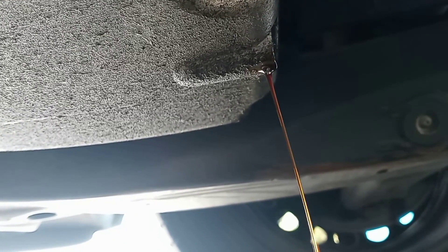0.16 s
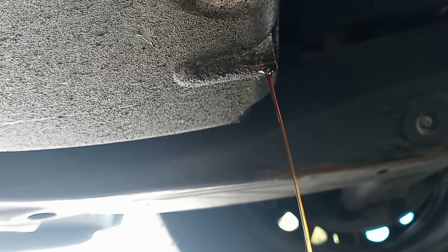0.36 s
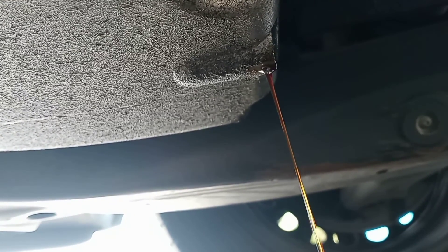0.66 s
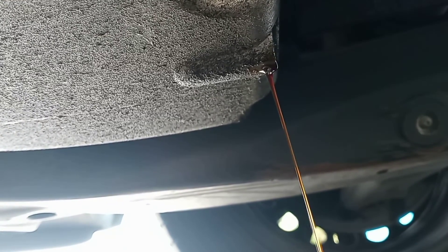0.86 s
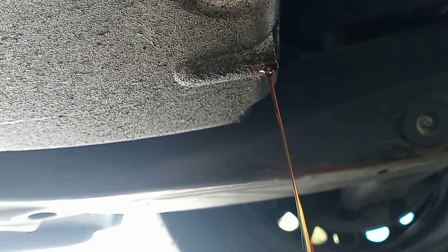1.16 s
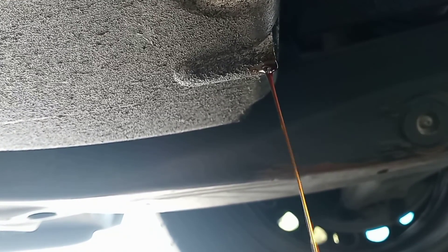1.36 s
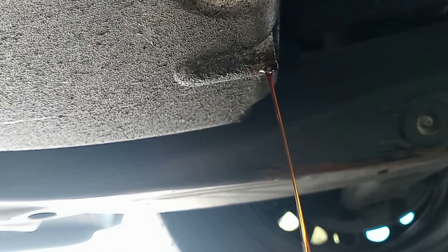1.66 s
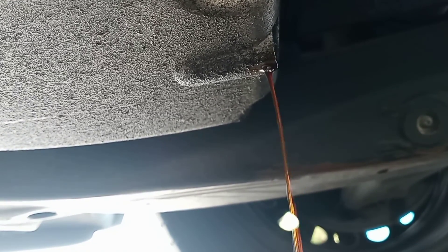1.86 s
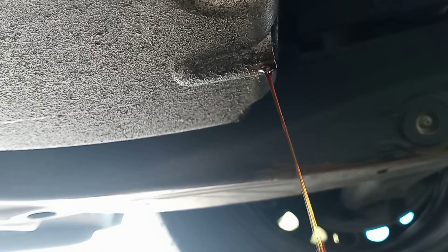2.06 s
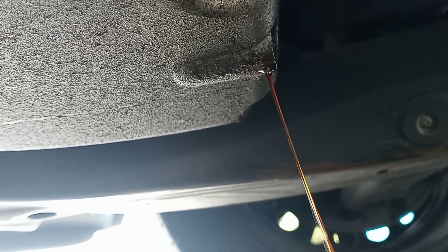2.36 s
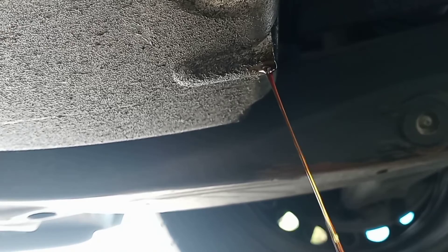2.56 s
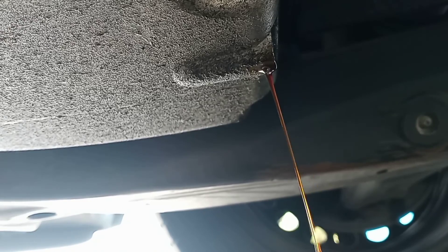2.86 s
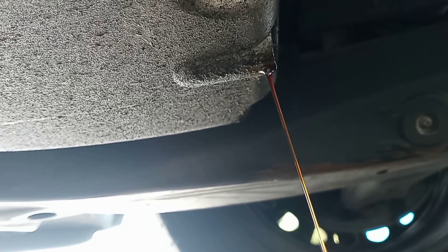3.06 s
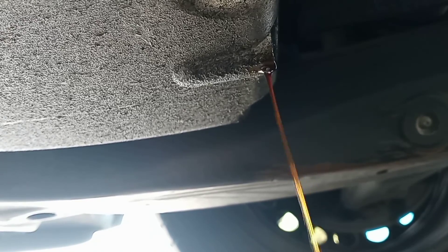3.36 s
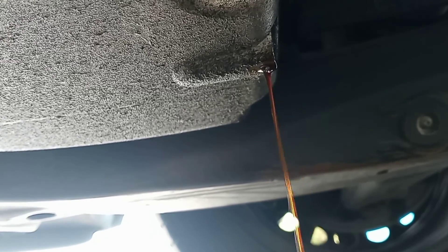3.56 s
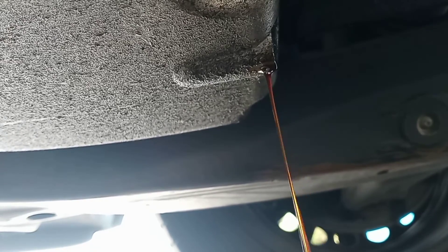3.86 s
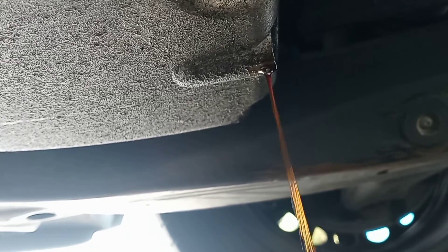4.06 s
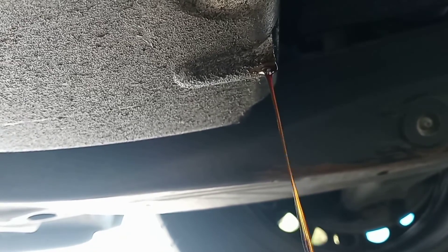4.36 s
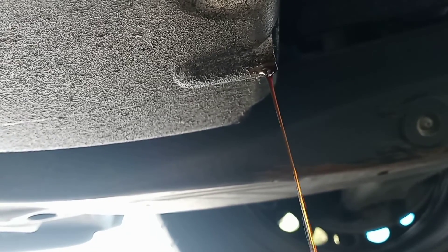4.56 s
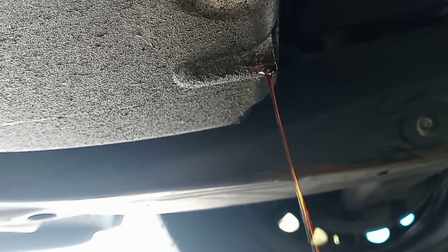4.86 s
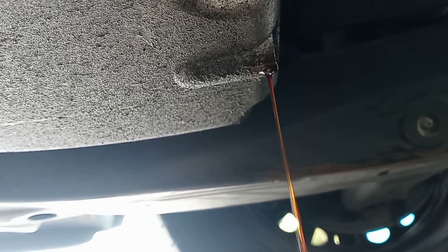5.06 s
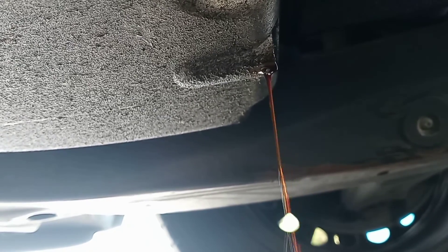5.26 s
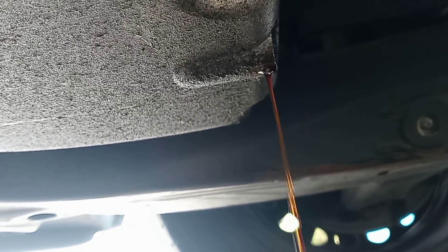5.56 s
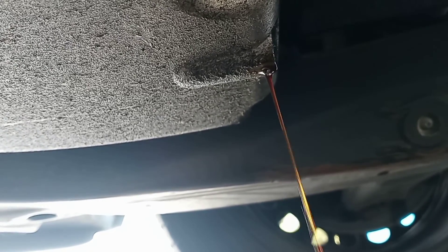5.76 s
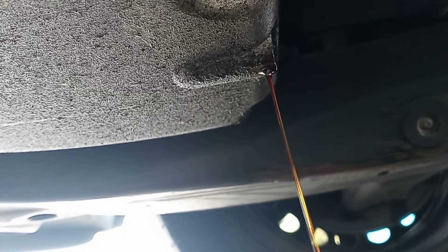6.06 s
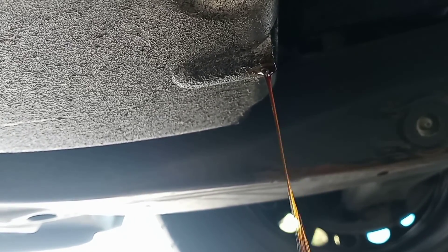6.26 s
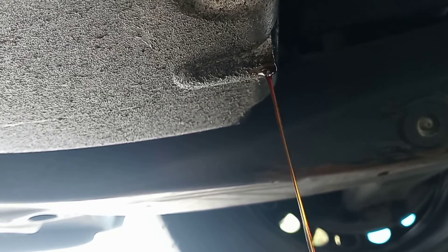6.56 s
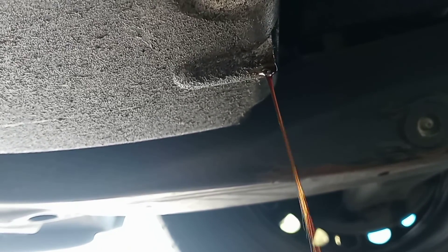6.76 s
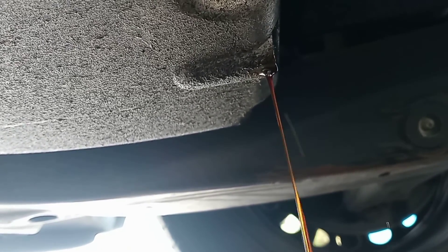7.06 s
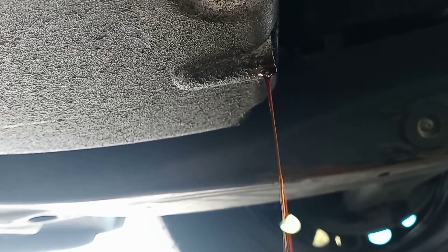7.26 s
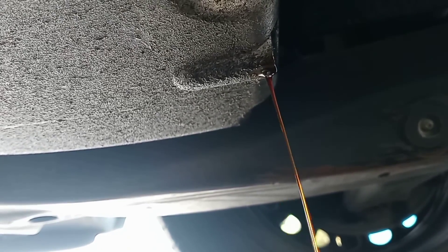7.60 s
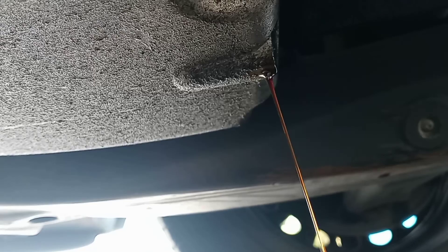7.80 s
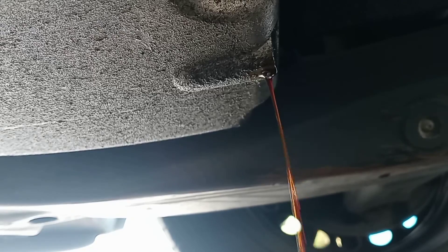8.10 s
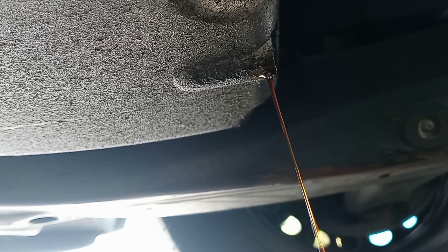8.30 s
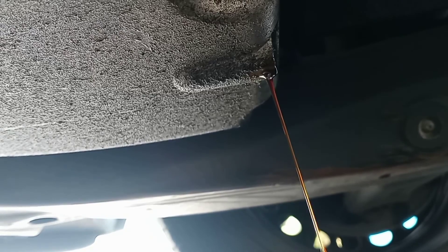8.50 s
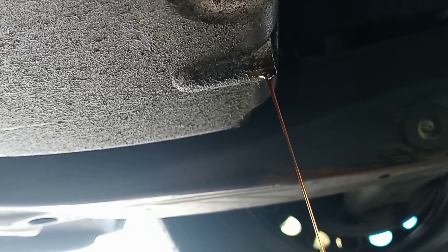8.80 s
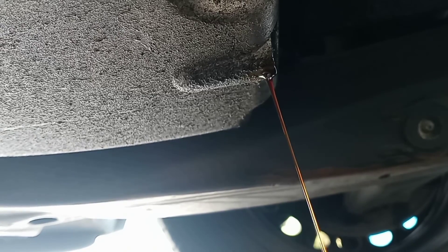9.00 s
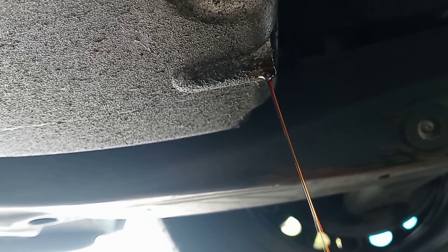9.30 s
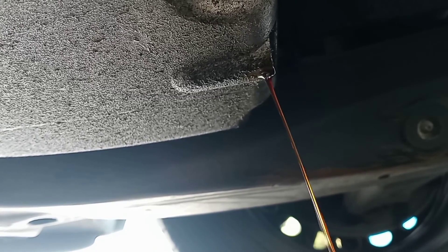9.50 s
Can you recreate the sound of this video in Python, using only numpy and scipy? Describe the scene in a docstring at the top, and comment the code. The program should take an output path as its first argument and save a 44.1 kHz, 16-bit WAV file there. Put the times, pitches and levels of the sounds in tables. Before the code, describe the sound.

A thin stream of oil breaks into drops over a drain pan, heard close beneath a car with tight, quick reflections. From 0 to 1.5 s small plinks and sharp ticks patter unevenly, some bright ones near 0.8 and 1.1 s. From 1.5 to 2.6 s drops become sparse while wind rumbles; muffled low thumps cluster from 2.25 to 3 s, strongest near 2.8. Busy pinging resumes at 3 to 3.8 s, with a loud round plink at 4.4 s. Scattered drops continue, with light wind bumps near 4.1, 4.9 and 5.7 s, and another busy patch around 6.2 s. It thins from 6.5 to 7.5 s, with a faint thump at 7.4. After 8 s the patter thickens, with a piercing tick at 8.25 s, and ends in crowded plinks and short upward chirps. Faint hiss, soft hum and distant traffic swell underneath, stopping at about 9.6 s without a finish.

```python
"""A thin stream of oil breaks into drops that patter into a drain pan under a car.
Each drop is a bubble, a decaying sine that pings or chirps upward, plus a noise tick for the splash.
Floor and underbody echo it closely, as scattered random reflections.
A breeze rumbles (shaped noise) and thumps (short pulses) on the microphone.
Distant traffic, hiss and narrow humming bands are noise whose levels wander."""
import sys
import numpy as np
from scipy import signal
from scipy.fft import rfft, irfft
from scipy.io import wavfile
from scipy.ndimage import uniform_filter1d

SR = 44100
rng = np.random.default_rng(int(sys.argv[2]) if len(sys.argv) > 2 else 0)


def wrap_up_sound(samples):
    """Save the sound to the file named by the first command line argument, as 16-bit audio."""
    columns = np.atleast_2d(samples).T
    # keep every value between -1 and 1, then stretch to whole-number steps
    tamed = np.clip(columns, -1, 1)
    steps = np.round(tamed * 32767).astype(np.int16)
    wavfile.write(sys.argv[1], SR, steps)


N = 425124  # length in samples
TOP_HZ = 15500  # highest bubble pitch, and where the final filter cuts


def undb(db):
    """Turn decibels into an amplitude factor."""
    return 10 ** (np.asarray(db) / 20)


def unit(x):
    """Scale to rms 1."""
    return x / np.sqrt(np.mean(x ** 2))


def curve(rows):
    """Draw straight lines through (time_s, value) rows, one value per sample."""
    return np.interp(np.arange(N) / SR, *np.transpose(rows))


def colour(x, points):
    """Shape the spectrum of x by (pitch_hz, level_db) points."""
    point_hz, point_db = np.transpose(points)
    hz = np.maximum(np.fft.rfftfreq(len(x), 1 / SR), 1)
    gain_db = np.interp(np.log(hz), np.log(point_hz), point_db)
    return irfft(rfft(x) * undb(gain_db), len(x))


def walk(rate):
    """Wandering level: random steps, rate per second, smoothed twice; rms 1."""
    hold = int(SR / rate)
    steps = np.repeat(rng.standard_normal(N // hold + 1), hold)
    smooth = uniform_filter1d(uniform_filter1d(steps, hold), hold)
    return unit(smooth[:N])


def add(out, s, grain):
    """Mix a short sound into out at time s."""
    i = int(s * SR)
    out[i:i + len(grain)] += grain[:max(len(out) - i, 0)]


def fade(t, t60):
    """Decay by 60 dB in t60 seconds."""
    return np.exp(-np.log(1000) * t / t60)


def echo(t, db, t60, first_s):
    """Scattered reflections: fading random spikes that start after first_s."""
    tail = rng.standard_normal(len(t)) ** 3 * fade(t, t60) * (t > first_s)
    return undb(db) * tail / np.linalg.norm(tail)


# gusts on the microphone: peak_s, peak_db, fall_s
GUST_PEAKS = [(0, -44, 0.19), (1.1, -45.5, 0.18), (1.8, -40.5, 0.12), (2.271, -40, 0.059),
              (2.47, -33.5, 0.08), (2.84, -34, 0.19), (4.15, -39, 0.044), (4.4, -45.5, 0.13),
              (4.89, -43, 0.22), (5.67, -33, 0.094), (6.4, -40.5, 0.52), (8.3, -50, 0.68)]
CALM_DB, RISE_SHARE = -50, 0.85  # level between gusts; rise time as a share of the fall


def gusting():
    """Strength of the breeze: a calm base and gusts that rise quicker than they fall."""
    t = np.arange(N) / SR
    power = undb(CALM_DB) ** 2
    for s, db, fall_s in GUST_PEAKS:
        width_s = fall_s * np.where(t < s, RISE_SHARE, 1)
        power = power + undb(db) ** 2 * np.exp(-((t - s) / width_s) ** 2)
    return np.sqrt(power)


# tone balance of the wind rumble, overall level set elsewhere: pitch_hz, level_db (per Hz)
RUMBLE_SHAPE = [(25, -24), (75, 3.5), (135, 3), (200, -11.5), (350, -24.5), (600, -45.5), (1300, -110)]


def rumble():
    """Turbulent air pressure: flickering low noise that follows the gusts."""
    flicker = undb(4.07 * walk(25))
    noise = colour(rng.standard_normal(N) * flicker, RUMBLE_SHAPE)
    return unit(noise) * gusting()


# tone balance of the distant noise, overall level set elsewhere: pitch_hz, level_db (per Hz)
YARD_SHAPE = [(90, -34.5), (150, -14), (310, -15), (545, -37), (790, -27.5), (1060, -33.5), (2000, -46.5),
              (4500, -52.5), (6300, -48.5), (7200, -59), (8200, -48.5), (9500, -48.5), (14800, -42)]
# how traffic swells, for the low band here and for the hum: time_s, level_db (relative)
TRAFFIC_SWELL = [(0, -3.5), (1, 8), (2, -5), (4.6, 2.5), (5.1, 7), (6, 4), (8.2, 4.5), (8.7, 10), (9.0, 6),
                 (9.64, 9.5)]


def yard():
    """Distant noise: traffic swells in the low band; above it each band flickers alone, up to the hiss."""
    air = unit(colour(rng.standard_normal(N), YARD_SHAPE))
    below = []  # the noise below each band edge
    for hz in np.geomspace(600, 14000, num=16):
        lowpass = signal.butter(2, hz, fs=SR, output="sos")
        below.append(signal.sosfiltfilt(lowpass, air))
    below.append(air)
    traffic = below[0] * undb(curve(TRAFFIC_SWELL) + 3.8 * walk(8))
    patches = np.zeros(N)
    for low, high in zip(below, below[1:]):
        patches += (high - low) * undb(4.5 * walk(12))
    shared_flicker = undb(0.74 * walk(4.4))
    return undb(-62.0) * (traffic + patches * shared_flicker)


# narrow humming bands in the distant noise, before the traffic swell: pitch_hz, level_db
HUM_BANDS = [(350, -79.5), (560, -79.5), (780, -83)]


def hum():
    """Narrow bands of noise: each wavers on its own, and all swell with the traffic."""
    bands = np.zeros(N)
    for hz, db in HUM_BANDS:
        peak = [(hz / 1.67, -30), (hz, 0), (hz * 1.43, -30)]
        noise = unit(colour(rng.standard_normal(N), peak))
        bands += undb(db + 4.3 * walk(7)) * noise
    return bands * undb(curve(TRAFFIC_SWELL))


CLOSE_S = 0.0049  # a glide of 1 climbs one octave in this time


def drop(db, hz, glide):
    """One drop: a shrinking air bubble rings, the splash ticks, and close surfaces echo both."""
    t = np.arange(2048) / SR
    # the cavity shrinks and its pitch climbs, with a small random drift
    drift = t * 3 * (rng.random() - .6)
    pitch = np.minimum(hz * 2 ** (glide * t / CLOSE_S + drift), TOP_HZ)
    # the churned surface makes it waver
    pitch = pitch * (1 + 0.17 * uniform_filter1d(rng.standard_normal(len(t)), size=60))
    # small bubbles die sooner, and quickly closing ones burst
    t60 = min(.03 * (hz / 2500) ** -2.2 + .003, .036)
    burst = np.exp(-(t * np.sqrt(glide) / 0.0059) ** 5)
    onset = 1 - np.exp(-t / 0.00032)
    ring = np.sin(2 * np.pi * np.cumsum(pitch) / SR)
    bubble = ring * fade(t, t60 * (1 + 5 * glide)) * burst * onset
    # the tick spreads around the bubble pitch, mostly upward, never twice alike
    edge = min(1.07 * hz, 0.55 * hz + 1300)
    bright_db = 5 * rng.standard_normal()
    tick_shape = [(0.82 * edge, -60), (edge, -19), (hz, 0),
                  (1.8 * hz, -16 + bright_db), (7 * hz, -24 + bright_db)]
    tick = unit(colour(rng.standard_normal(len(t)), tick_shape))
    # gliding drops hardly tick; large, low bubbles come from softer entries
    tick_db = -6 - 11 * glide + 7 * min(np.log2(hz / 5000), 0)
    splash = undb(tick_db) * tick * fade(t, 0.012) * (1 - np.exp(-t / 0.00013))
    direct = bubble + splash
    # each drop gets its own random scatter of close echoes
    surfaces = echo(t, 0.85, 0.044, 0.00083)
    echoed = irfft(rfft(direct, n=4096) * rfft(surfaces, n=4096))[:len(t)]
    return undb(db) * (direct + echoed)


# drops whose bubble rings at a nearly steady pitch: start_s, level_db, pitch_hz
PING_DROPS = [(.01, -57, 2090), (.063, -47, 5170), (0.124, -38.5, 3450), (0.157, -37.5, 8600),
              (.201, -35.5, 2890), (.233, -39, 7840), (0.232, -42.5, 2790), (.3, -54, 2020),
              (.327, -42.5, 2070), (0.34, -44, 2310), (0.355, -36.5, 2105), (.37, -46, 2290),
              (0.378, -37, 6480), (0.412, -47, 7740), (0.418, -47, 5340), (.492, -38.5, 3660),
              (0.532, -42, 9550), (.55, -47, 8700), (.793, -26.5, 7570), (0.799, -43, 2610),
              (.857, -36, 2910), (0.924, -44, 12300), (.965, -46.5, 2860), (1.105, -26, 8960),
              (1.143, -46, 2530), (1.181, -39, 12200), (1.189, -38.5, 2510), (1.209, -35, 2277),
              (1.261, -43, 5700), (1.295, -32, 3180), (1.415, -37, 10200), (1.464, -34.5, 2930),
              (1.821, -44.5, 9640), (1.843, -48.5, 9300), (1.896, -31, 6950), (2.044, -40.5, 4620),
              (2.418, -44, 7960), (2.652, -40, 8900), (2.764, -48, 3160), (2.799, -34, 3545),
              (2.852, -50, 4120), (2.877, -35, 12900), (2.885, -41.5, 5550), (2.979, -41.5, 5470),
              (2.989, -41, 2540), (3.038, -43.5, 10400), (3.126, -45, 2280), (3.2, -34.5, 3720),
              (3.238, -44.5, 3000), (3.244, -37, 8400), (3.313, -24.5, 7450), (3.313, -46, 2350),
              (3.353, -46, 7000), (3.364, -46, 3220), (3.385, -44, 3090), (3.422, -43, 2160),
              (3.449, -46, 4580), (3.485, -37, 2080), (3.493, -35.5, 8960), (3.497, -38.5, 2240),
              (3.513, -38, 4770), (3.529, -41.5, 3940), (3.553, -30, 2533), (3.579, -40.5, 3630),
              (3.587, -40, 11800), (3.698, -47.5, 2630), (3.756, -35, 2220), (3.856, -42.5, 2880),
              (3.987, -37, 5390), (4.07, -43.5, 8240), (4.191, -28.5, 10660), (4.22, -34, 2115),
              (4.318, -48.5, 3590), (4.35, -33.5, 2210), (4.392, -20.5, 2584), (4.435, -39, 9400),
              (4.519, -35, 6400), (4.544, -50, 6730), (4.672, -34.5, 2030), (4.757, -35, 1780),
              (4.822, -45, 12500), (4.898, -32, 8260), (4.915, -46.5, 3840), (5.125, -41.5, 8800),
              (5.16, -51.5, 4400), (5.219, -45, 5660), (5.298, -40, 12700), (5.319, -37.5, 3900),
              (5.417, -32.5, 6370), (5.423, -40.5, 2750), (5.548, -29, 2837), (5.579, -37.5, 2060),
              (5.638, -41.5, 5600), (5.659, -37.5, 5980), (5.925, -33.5, 2624), (5.985, -40, 2525),
              (6.068, -50, 2460), (6.125, -36.5, 1820), (6.124, -37, 6120), (6.153, -30, 6340),
              (6.169, -32, 9100), (6.206, -33.5, 2443), (6.262, -44.5, 4200), (6.31, -30.5, 4270),
              (6.338, -23.5, 8420), (6.443, -34.5, 2330), (6.487, -42.5, 9500), (6.707, -41, 6350),
              (6.799, -47, 2390), (7.194, -43, 9650), (7.268, -36, 2570), (7.369, -35, 3850),
              (7.556, -26.5, 2360), (7.589, -39.5, 2250), (7.701, -31.5, 1778), (7.85, -49.5, 3640),
              (7.891, -38, 5020), (7.969, -47, 2320), (8.05, -45.5, 2980), (8.121, -41.5, 9700),
              (8.138, -34, 3420), (8.157, -47, 2670), (8.172, -42, 9600), (8.185, -43, 2550),
              (8.209, -43.5, 2230), (8.231, -38.5, 2145), (8.253, -18, 12930), (8.255, -40.5, 1950),
              (8.282, -47, 2250), (8.303, -29.5, 7270), (8.304, -54, 2480), (8.319, -42, 13500),
              (8.33, -45, 2330), (8.355, -27, 2663), (8.454, -52, 6700), (8.553, -33, 7250),
              (8.616, -38.5, 3940), (8.613, -43.5, 2480), (8.656, -51, 7500), (8.668, -39, 2530),
              (8.689, -40.5, 4440), (8.738, -46, 9000), (8.777, -53.5, 4800), (8.805, -43.5, 4230),
              (8.811, -50.5, 8200), (8.836, -38, 2290), (8.855, -43, 2310), (8.883, -42, 2300),
              (8.904, -47, 8450), (8.932, -43, 4380), (8.933, -43, 2580), (8.977, -37.5, 2015),
              (9.001, -38.5, 2360), (9.027, -38.5, 4340), (9.029, -39.5, 2630), (9.081, -42.5, 2610),
              (9.095, -41.5, 3580), (9.111, -39.5, 3760), (9.14, -48, 3070), (9.168, -39, 14000),
              (9.173, -29, 3810), (9.204, -28, 2435), (9.242, -38.5, 5750), (9.303, -53, 4400),
              (9.333, -41, 5300), (9.34, -33, 2160), (9.411, -35, 5300), (9.436, -38, 3470),
              (9.466, -33.5, 2480), (9.516, -38.5, 5800), (9.517, -35.5, 2500), (9.53, -35.5, 2410),
              (9.561, -43, 8100), (9.583, -32.5, 2320), (9.621, -41, 2490)]
# drops whose cavity closes and chirps upward; a little extra glide is added to each:
# start_s, level_db, starting pitch_hz, glide (octaves per CLOSE_S)
CHIRP_DROPS = [(0.844, -41, 3640, 0.86), (.922, -41, 3900, 3.7), (1.003, -54.5, 3660, 1.6),
               (1.176, -43, 3730, 0.46), (1.246, -40.5, 3580, 1.9), (1.957, -44.5, 2650, 2.4),
               (2.519, -32, 3150, 1.5), (2.669, -34.5, 3330, 2.4), (3.593, -39, 4040, 10.6),
               (3.695, -48.5, 5930, 0.89), (4.061, -43, 2590, 0.78), (4.128, -47, 3490, 0.65),
               (4.97, -42, 2030, 0.52), (4.998, -36.5, 2055, 0.46), (5.112, -46, 4060, 0.66),
               (5.385, -50, 5270, 1.9), (5.468, -50.5, 4400, 1), (6.067, -43, 4280, 3.8),
               (6.167, -39, 3290, 1.16), (6.174, -48, 4440, 0.42), (6.233, -37, 4100, 1.9),
               (6.346, -42.5, 2970, 1.34), (7.75, -38, 2900, 1.97), (8.637, -55, 2950, 0.41),
               (8.714, -40.5, 3700, 2.4), (9.019, -48.5, 4660, 1.6), (9.196, -36.5, 3550, .5),
               (9.347, -37.5, 3500, .25), (9.265, -36.5, 3920, 0.96), (9.361, -38, 4200, 0.91),
               (9.397, -35.5, 3980, 1.7), (9.464, -31.5, 4340, 0.27), (9.571, -49, 3200, .8),
               (9.589, -30, 4060, 0.14), (9.624, -31.5, 3380, 0.77)]
# resonances of the pan and the gap under the car, heard on the drops: pitch_hz, level_db
GAP_SHAPE = [(1800, -8), (2550, -1), (3200, -3), (3750, 1), (4500, 3), (5050, -2), (5600, 4), (7100, 2),
             (8400, 5), (9500, 0)]
# small trailing drops: spread of delays, base level before adjustments, range of sizes, spread of pitch
TRAIL_S, TRAIL_DB, TRAIL_RANGE_DB, TRAIL_OCTAVES = .055, -52.5, 14.5, 1.38
# bubble that a drop drags under late: lowest pitch, base level before adjustments
GURGLE_HZ, GURGLE_DB = 2052, -59


def patter():
    """Clear drops, each trailed by two small ones and a late low bubble; the garage adds a weak tail."""
    out = np.zeros(N)
    drops = np.array([tuple(row) + (0,) for row in PING_DROPS] + list(CHIRP_DROPS))
    for s, db, hz, glide in drops:
        extra_glide = 0.012 + 0.048 * rng.random() ** 2
        add(out, s, drop(db, hz, glide + extra_glide))
        # where drops crowd, the surface is churned and the small ones splash harder
        crowd = np.sum(abs(drops[:, 0] - s) < .12)
        chance = rng.random(size=(3, 3))
        for delay, size, pitch in chance[1:]:
            trail_db = TRAIL_DB + 0.52 * crowd + 0.17 * (db + 27.0) - TRAIL_RANGE_DB * size
            trail_hz = min(hz * 2 ** (TRAIL_OCTAVES * pitch ** 2 - .1), 12000)
            add(out, s + .006 + TRAIL_S * delay, drop(trail_db, trail_hz, 0.046))
        delay, size, pitch = chance[0]
        gurgle_db = GURGLE_DB + 1.35 * (min(crowd, 9) - 6) - 14 * size
        gurgle_hz = GURGLE_HZ * 2 ** (.45 * pitch)
        add(out, s + 0.011 + 0.034 * delay, drop(gurgle_db, gurgle_hz, 0.02))
    # a high-pass keeps the patter thin, with no low body under the drops
    highpass = signal.butter(4, 1600, "highpass", fs=SR, output="sos")
    out = signal.sosfilt(highpass, colour(out, GAP_SHAPE))
    garage = echo(np.arange(SR // 2) / SR, -19.5, 0.064, 0.0055)
    return out + signal.fftconvolve(out, garage)[:N]


# single eddies that burst on the microphone, before the bass cut: start_s, peak_db, length_ms
EDDY_THUMPS = [(2.256, -23.5, 15.8), (2.303, -19, 17.4), (2.5, -17.5, 17.4), (2.657, -16.5, 17.4),
               (2.72, -20, 8.9), (2.769, -16, 15.3), (2.79, -24, 14), (2.827, -10.5, 13.8),
               (2.912, -19, 13), (2.955, -18.5, 12.2), (4.138, -15.5, 11), (4.881, -16.5, 15),
               (4.932, -20, 16.5), (5.656, -24, 13.7), (7.412, -22.5, 16.6)]


def thumps():
    """Lone suction pulses of the breeze; the microphone drops their bass."""
    pulses = np.zeros(N)
    for s, db, ms in EDDY_THUMPS:
        add(pulses, s, undb(db) * np.hanning(int(ms * SR / 1000)) ** 7)
    bass_cut = signal.butter(3, 85., "highpass", fs=SR, output="sos")
    return signal.sosfilt(bass_cut, pulses)


def scene():
    """Drops under the car, breeze and yard, as one channel."""
    breeze = rumble() + thumps()
    return (patter() + breeze + yard() + hum())[None]


def record(dry):
    """The phone cuts the top: a steep low-pass filter."""
    return signal.sosfilt(signal.ellip(10, .2, 75, TOP_HZ, fs=SR, output="sos"), dry)


dry = scene()
out = record(dry)
wrap_up_sound(out)
```